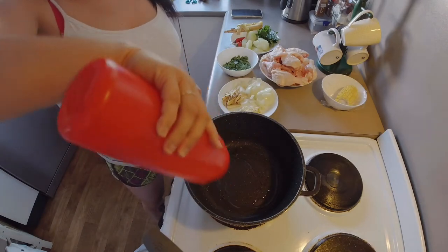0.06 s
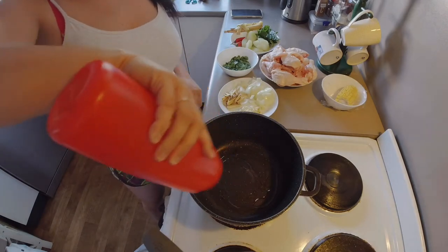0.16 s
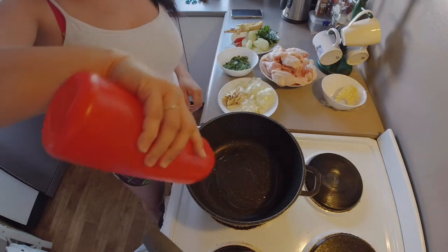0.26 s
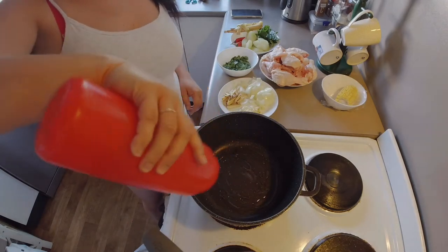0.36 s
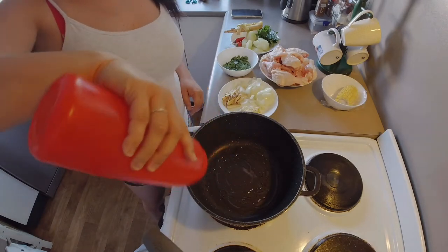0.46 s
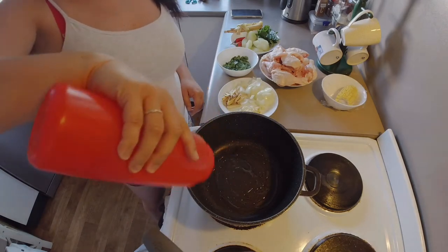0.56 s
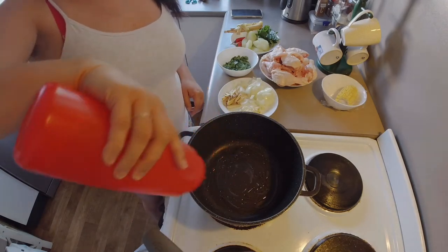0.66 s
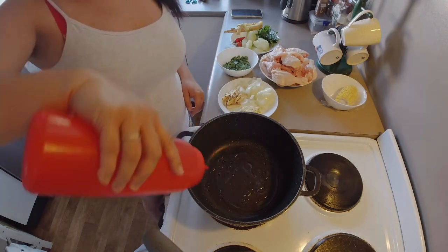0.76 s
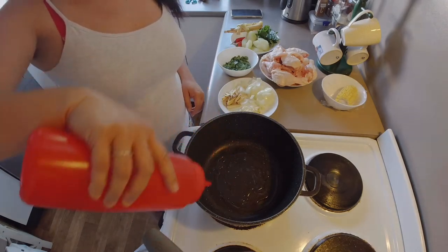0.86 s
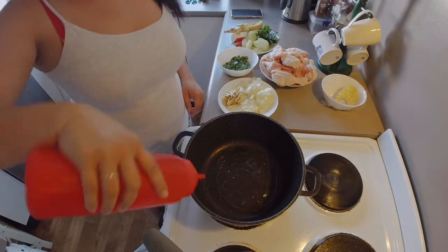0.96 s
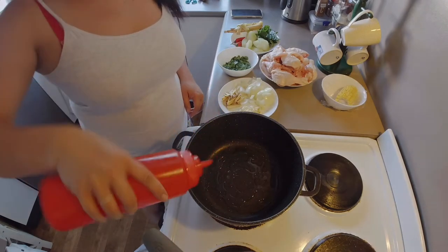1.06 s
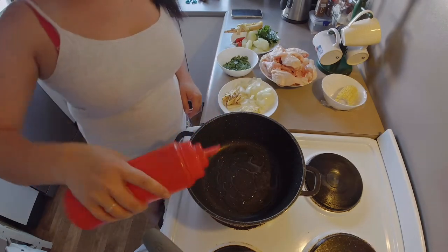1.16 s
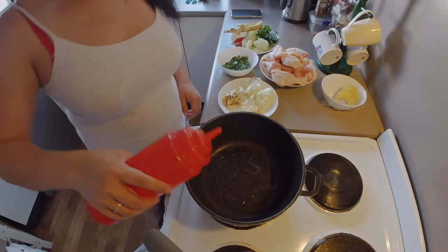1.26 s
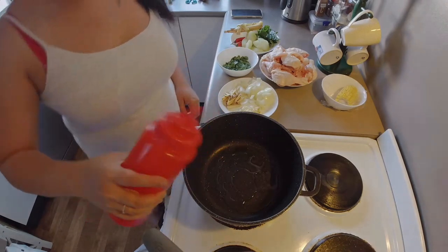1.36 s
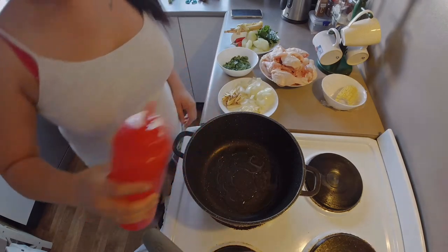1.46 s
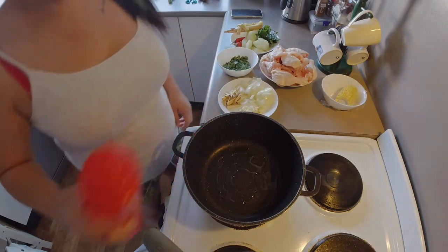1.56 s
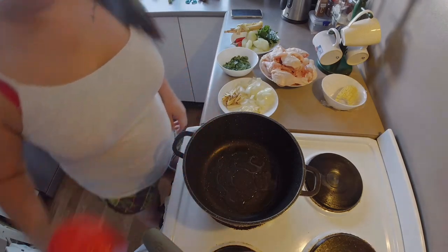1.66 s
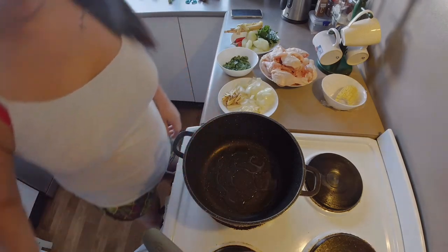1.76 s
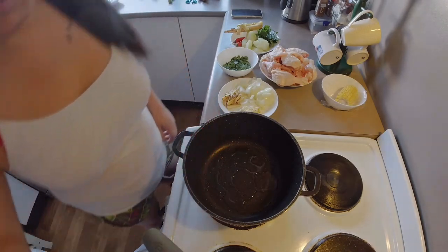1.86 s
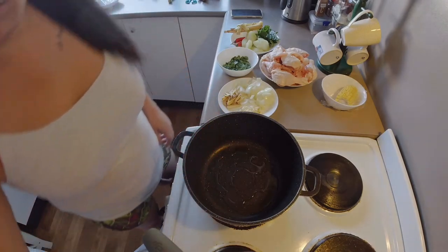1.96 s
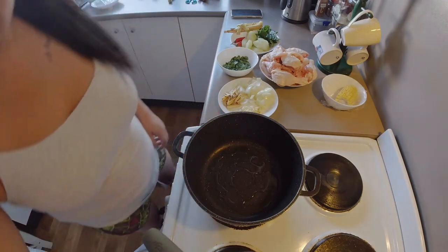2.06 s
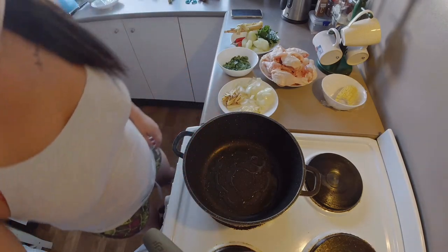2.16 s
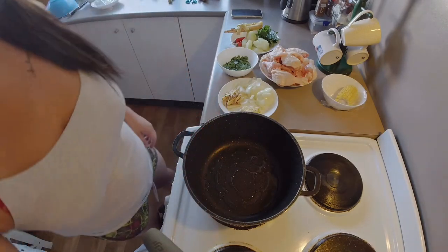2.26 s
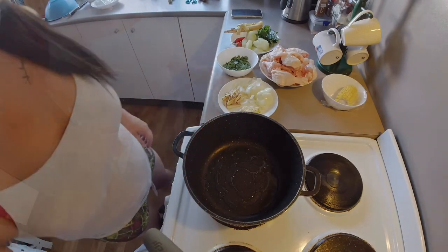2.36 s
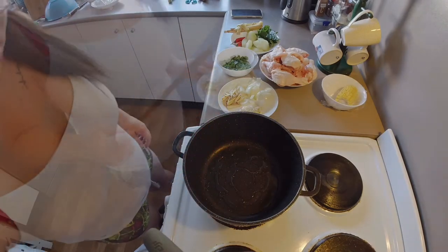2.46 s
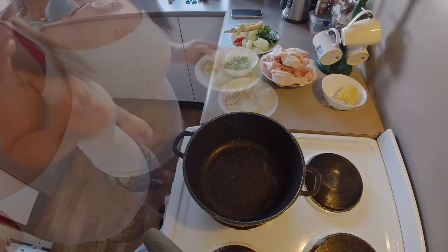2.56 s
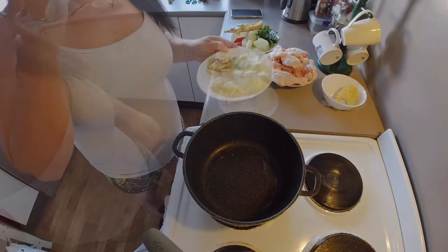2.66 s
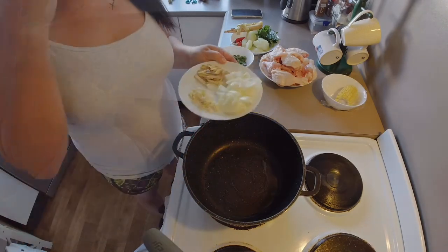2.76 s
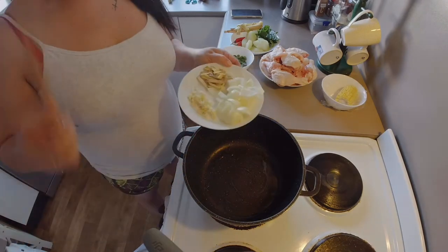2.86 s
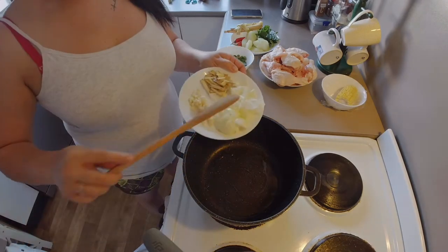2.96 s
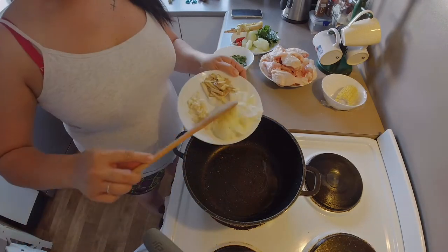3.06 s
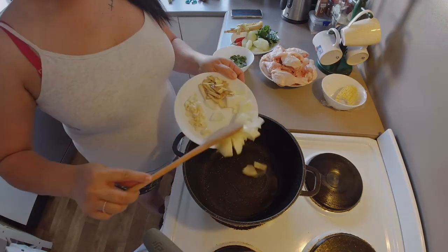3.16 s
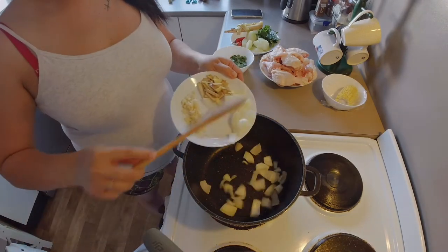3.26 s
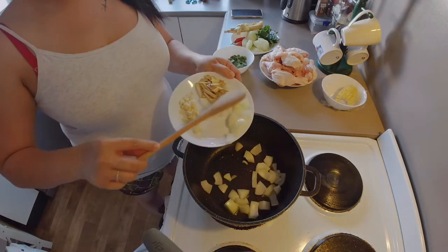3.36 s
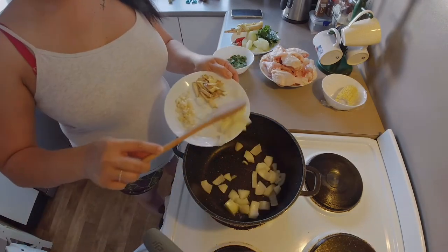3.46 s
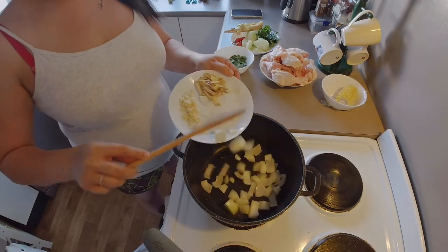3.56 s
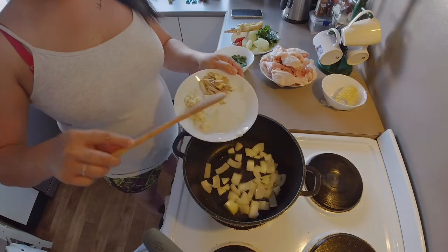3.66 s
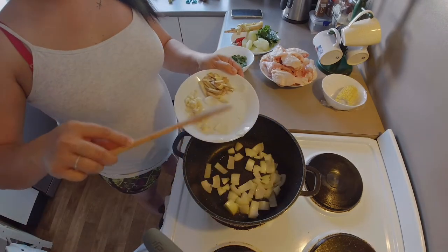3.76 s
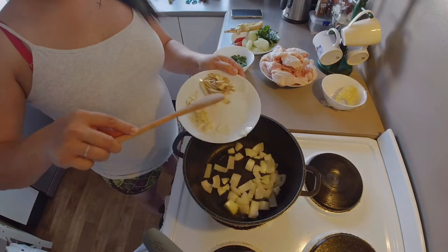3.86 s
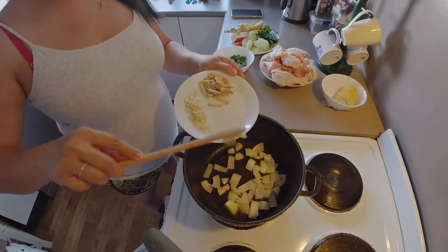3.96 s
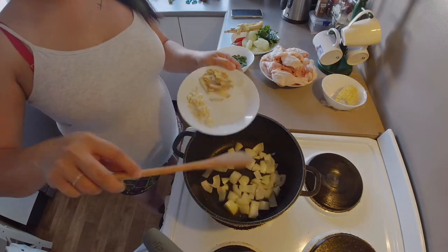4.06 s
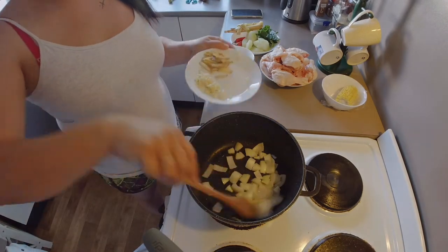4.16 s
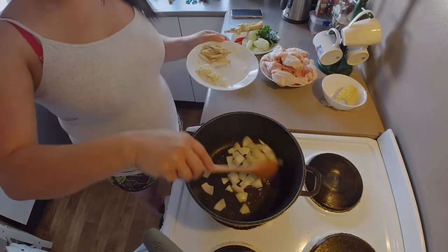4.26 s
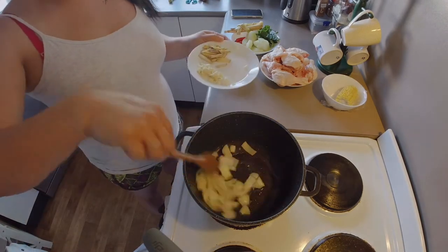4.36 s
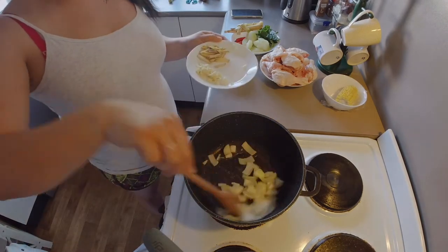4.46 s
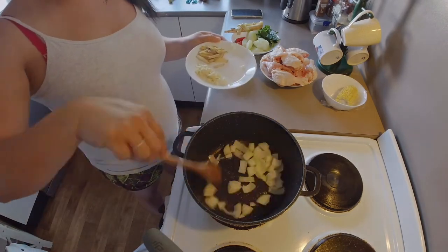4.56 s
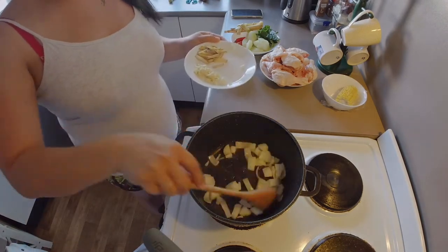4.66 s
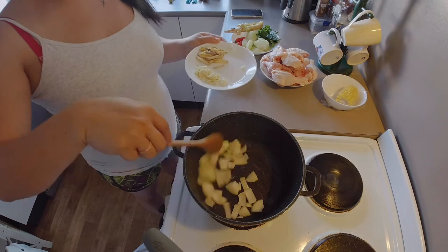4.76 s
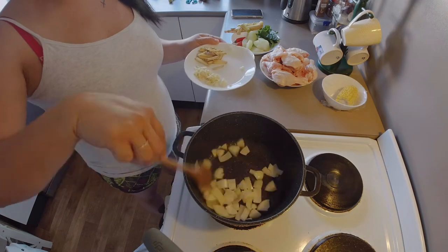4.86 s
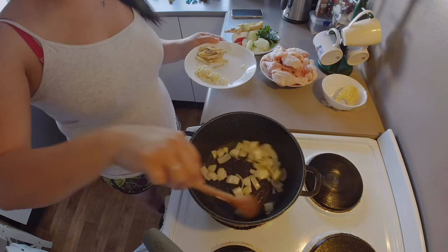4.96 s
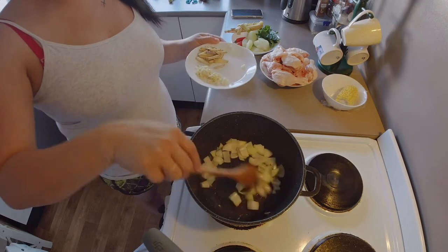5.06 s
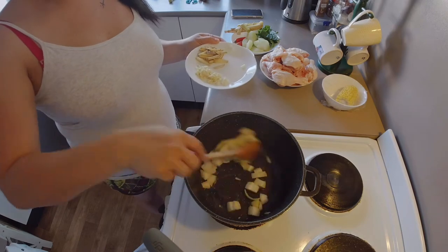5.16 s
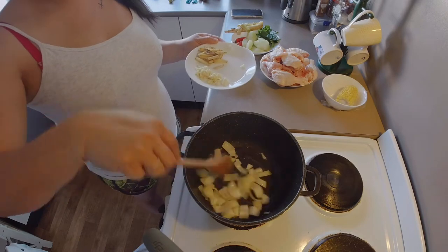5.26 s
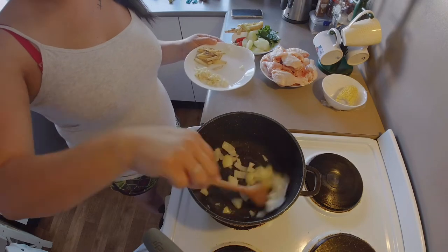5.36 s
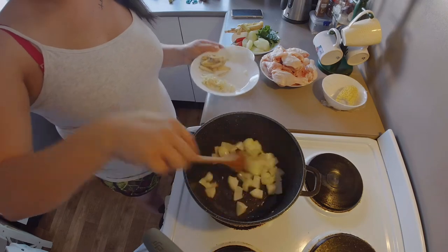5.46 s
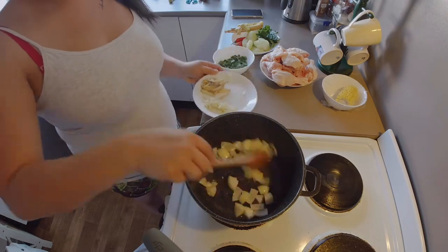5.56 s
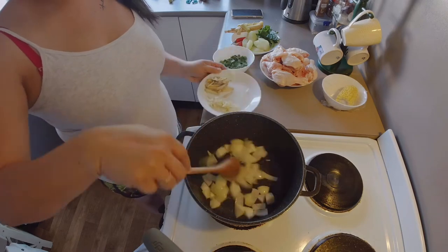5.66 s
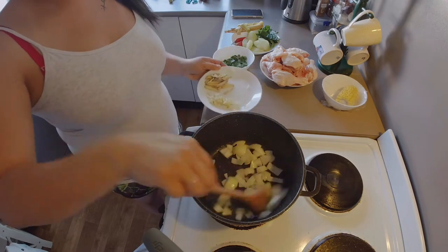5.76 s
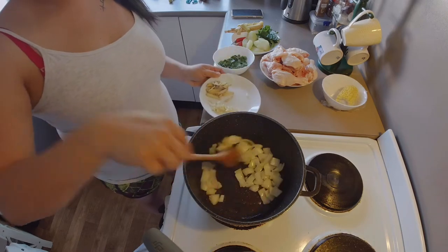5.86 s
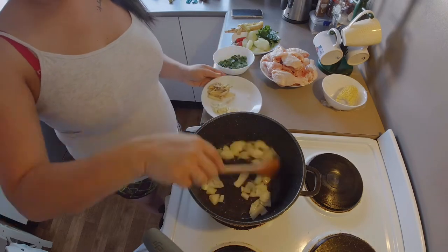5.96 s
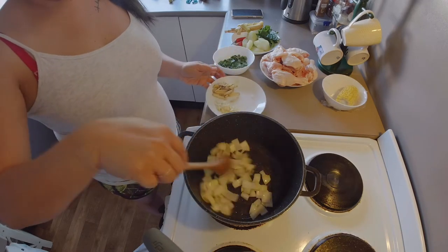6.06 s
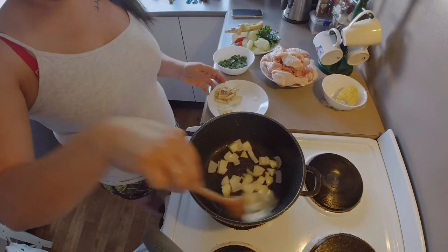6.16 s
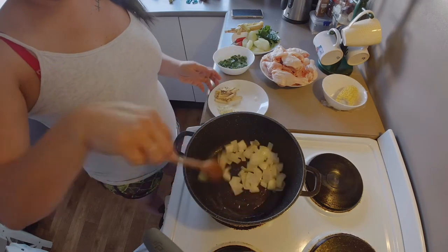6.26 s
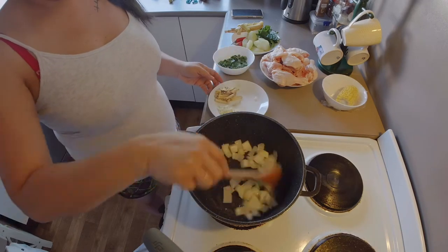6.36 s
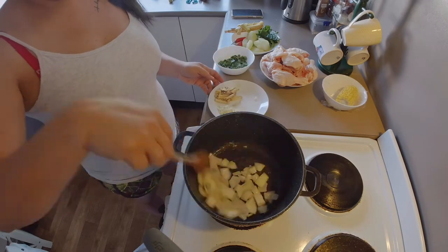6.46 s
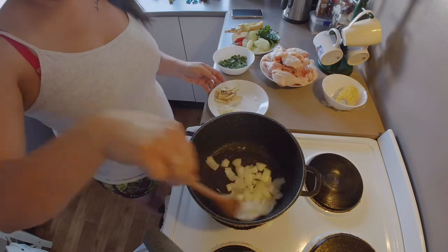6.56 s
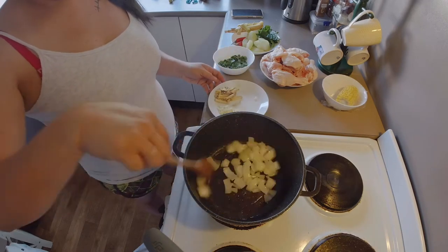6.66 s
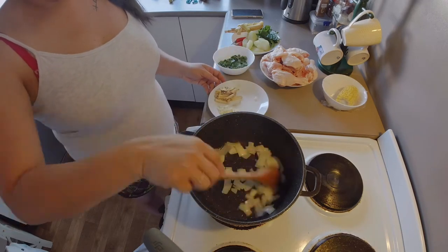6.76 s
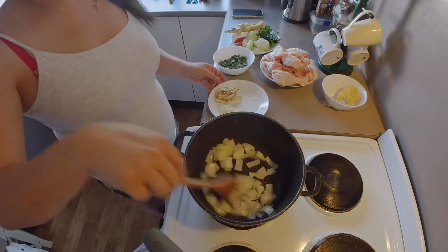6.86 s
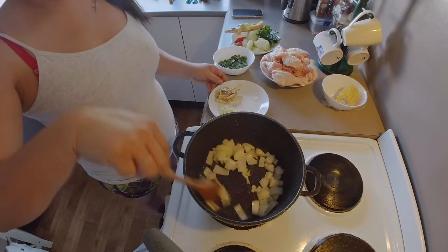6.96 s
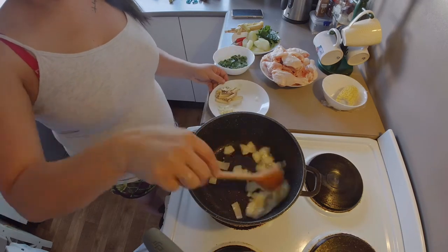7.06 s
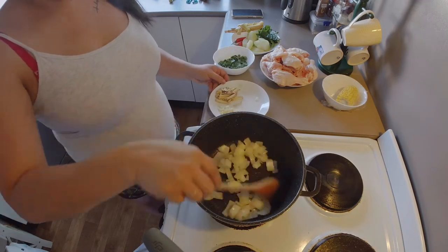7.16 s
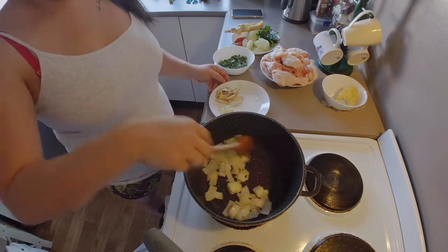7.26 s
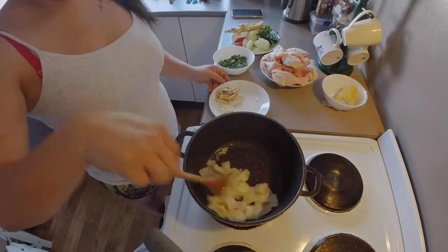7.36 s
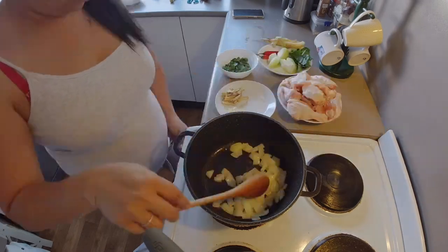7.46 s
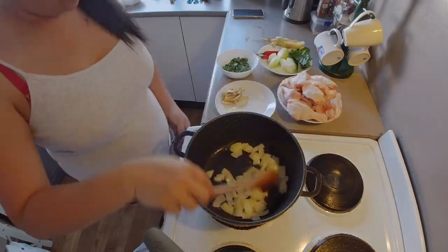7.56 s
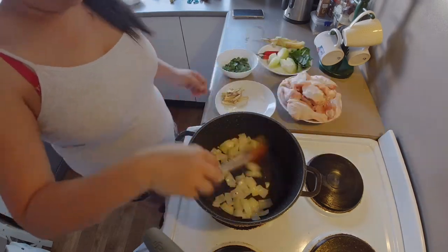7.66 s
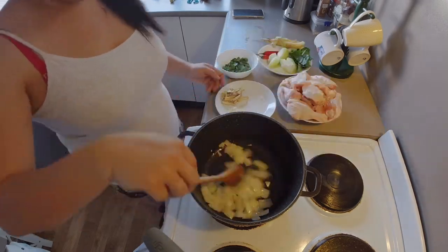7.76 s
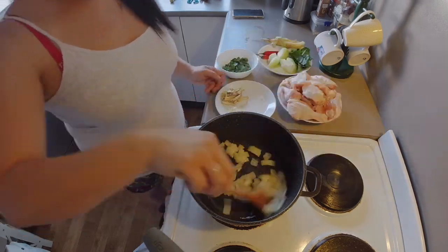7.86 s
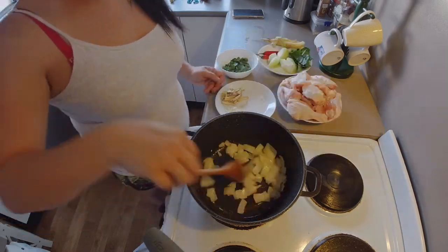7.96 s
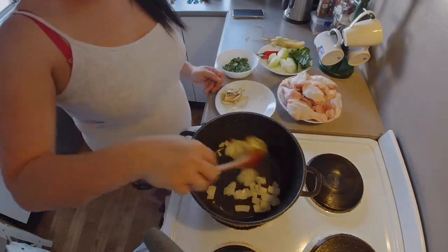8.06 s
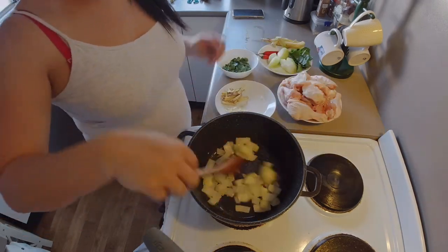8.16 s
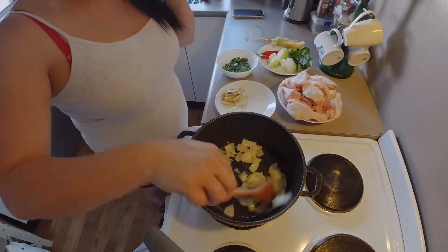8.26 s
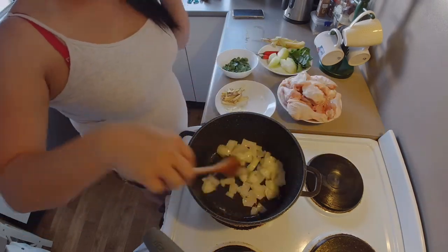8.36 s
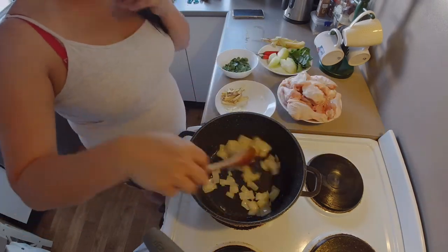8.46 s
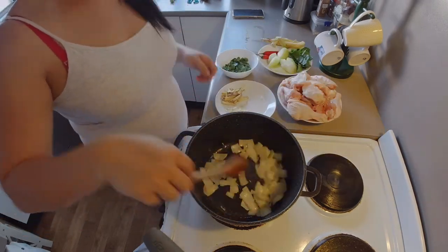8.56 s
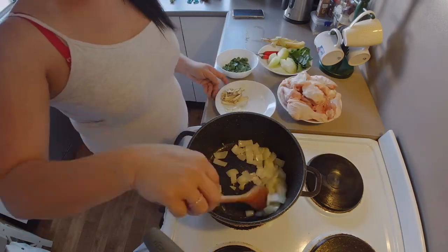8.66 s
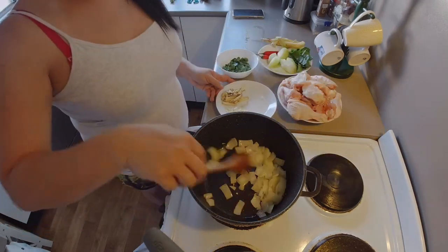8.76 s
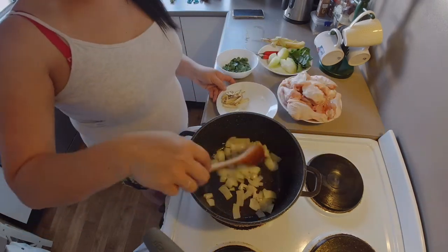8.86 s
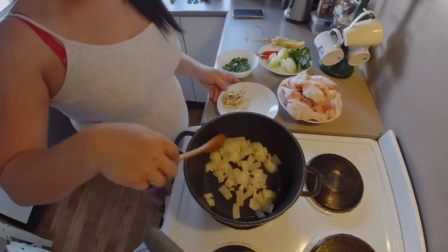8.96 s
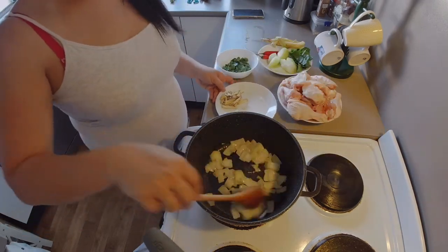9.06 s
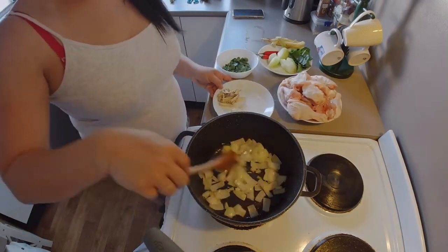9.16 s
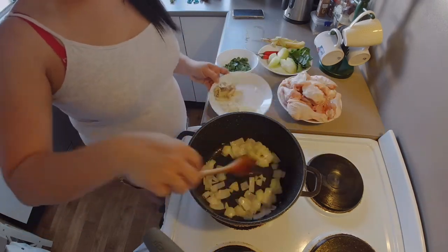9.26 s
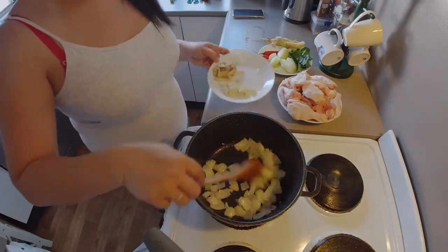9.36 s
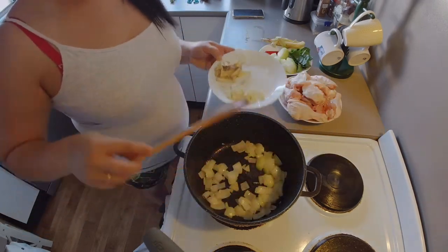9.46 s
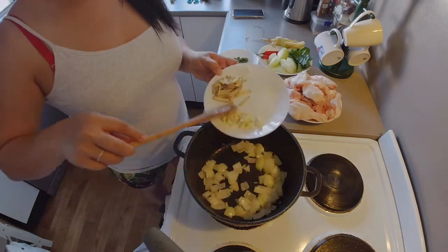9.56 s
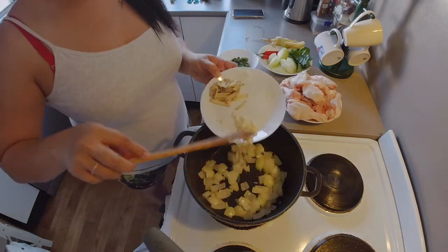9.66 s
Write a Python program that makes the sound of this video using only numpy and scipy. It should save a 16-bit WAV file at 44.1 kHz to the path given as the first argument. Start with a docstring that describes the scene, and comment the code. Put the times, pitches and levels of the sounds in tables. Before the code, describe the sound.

A plastic bottle clicks, a cupboard bangs, then onion drops into hot oil, sizzling and spitting as a wooden spoon knocks and scrapes.

```python
"""A bottle snaps and whistles, a cupboard bangs, then frying swells, crackles and slowly dies down under wooden knocks.
Oil is squeezed into a heavy pot, and the bottle is put away; diced onion slides off a plate into the hot oil.
A wooden spoon pushes it round and rings the metal wall, over the low hum of a small kitchen, from just above the stove.
Blows are short noise bursts through resonant filters with decaying modes; bubbles and friction are dense random
clicks through filters; hum is filtered noise. Phase and level differences between the two sides give width."""
import sys
import numpy as np
from scipy import signal
from scipy.fft import rfft, irfft, next_fast_len
from scipy.io import wavfile
from scipy.ndimage import uniform_filter1d

SR = 44100
rng = np.random.default_rng(int(sys.argv[2]) if len(sys.argv) > 2 else 0)


def int16_out(signal):
    """Quantize to a 16-bit WAV file."""
    q = np.round(np.clip(np.atleast_2d(signal).T, -1, 1) * 32767)
    wavfile.write(sys.argv[1], SR, q.astype(np.int16))


N = 428211
T = np.arange(N) / SR  # time in s

# Colour of the simmer, and of the pot floor under a scrape: pitch_hz, level_db
SIMMER = [(900, -19), (1500, -20), (1800, -9), (2250, -1), (2620, 5.5), (2950, -7.5), (3150, -15.5),
          (3600, 5.5), (4100, -3), (4500, 0), (5600, 3), (9000, -30.5)]
# Resonances of a hard contact on the pot: pitch_hz, level_db
CLACK = [(800, -15), (1130, -17.5), (1280, -3), (1400, -8), (1520, 6), (1700, -12), (2280, 2), (2420, 1),
         (2620, 9), (2980, -1), (3150, -11), (5000, -44)]
# Width of the sound from the pot: pitch_hz, greatest side_minus_mid_db
POT_WIDTH = [(60, -14), (125, -13), (250, -10), (500, -16), (1000, -24), (2000, -20), (4000, -13),
             (8000, -9), (15000, -5)]
# Dice landing in the pot: start_s, level_db, hardness_db (treble up, bass down)
DICE = [(3.119, -54.5, -2), (3.148, -46.5, 0.5), (3.18, -41, -0.5), (3.208, -43, 3.5), (3.217, -35, -1),
        (3.227, -35, 2), (3.254, -35, 3.5), (3.53, -40.5, 5), (3.563, -38.5, 8), (3.659, -44, 1)]
# Spoon against the wall, then dropping to the floor: start_s, level_db, hardness_db, drop_level_db,
# ring_db, ring_tilt (dB per octave), lowest_mode_db (added to the lowest mode)
WALL_KNOCKS = [(4.227, -40.5, 6, -61, -55, -22, 1), (4.357, -46.5, 0, -43.5, -47.5, 8, 7),
               (5.31, -41.5, -6.5, -50, -48, -15, -3), (6.461, -46.5, 3, -62, -43.5, 0.5, 7),
               (6.54, -41.5, 0.5, -44.5, -44, -1, -8), (6.962, -42.5, 6, -41.5, -40.5, -8, -14),
               (7.351, -41.5, 1, -61, -42, 8, 7), (7.733, -39, 0, -44, -36.5, 1, -12),
               (8.718, -39, 2, -40, -46, 1.5, -14), (9.115, -40.5, -7, -43, -48.5, -7, -16)]

LANDS_S, SWELL_S = 3.12, 0.18  # frying starts as the onion lands, and its rise time
FIZZ_DB = -45.5  # fizz level while the onion is wet
HUSH_S = 7.459  # the ring stops dead here and the frying dips briefly
STIR_FROM_S, STIR_TO_S, STROKES_PER_S = 4.15, 9.4, 2.5


def undb(db):
    """Decibels are logarithmic: convert them to amplitude gain."""
    return 10 ** (np.asarray(db) / 20)


def unit(x):
    """Root-mean-square normalisation: scale to rms 1."""
    return x / np.sqrt(np.mean(x ** 2))


def curve(rows):
    """Linear interpolation of (time, value) rows over the whole scene."""
    rows = np.array(rows)
    return np.interp(T, rows[:, 0], rows[:, 1])


def colour(x, points):
    """Minimum-phase filtering through (Hz, dB) points: resonances ring only after they are excited."""
    size = 4096
    hz, db = np.transpose(sorted(points))
    log_hz = np.log(np.fft.rfftfreq(size, 1 / SR) + 1)
    log_gain = np.log(undb(np.interp(log_hz, np.log(hz), db)))
    # folding the cepstrum on to positive times makes the filter causal
    cepstrum = irfft(log_gain)
    cepstrum[1:size // 2] *= 2
    cepstrum[size // 2 + 1:] = 0
    response = irfft(np.exp(rfft(cepstrum)))
    return signal.fftconvolve(x, response)[:len(x)]


def fade(t60, size):
    """Exponential damping: amplitude falls by 60 dB in t60 seconds."""
    return np.exp(-np.log(1000) * T[:size] / t60)


def mode(hz, t60, size):
    """Free vibration: one damped sinusoidal mode."""
    return np.sin(2 * np.pi * hz * T[:size]) * fade(t60, size)


def burst(t60, size):
    """Broadband excitation: white noise under exponential damping."""
    return rng.standard_normal(size) * fade(t60, size)


def blow(x, db):
    """Short-time energy: set the rms level of the loudest 10 ms."""
    return x * undb(db) / np.sqrt(uniform_filter1d(x ** 2, SR // 100).max())


def add(track, s, x):
    """Superposition: mix a sound in at time s."""
    start = max(int(s * SR), 0)
    track[start:start + len(x)] += x[:N - start]


def walk(rate):
    """Slow modulation: a smoothed random wander of rms 1, with rate new values per second."""
    hold = max(int(SR / rate), 1)
    steps = np.repeat(rng.standard_normal(N // hold + 1), hold)[:N]
    return unit(uniform_filter1d(steps, hold))


def crackle(rate, spread_db, tail_s, cap_db, count=6):
    """Shot noise: many small and a few large random clicks, in families of short noise tails; rms 1."""
    out, clicks = np.zeros(N), int(rate * N / SR / count)
    for _ in range(count):
        size_db = np.minimum(spread_db * rng.exponential(size=clicks), cap_db)
        size = undb(size_db) * rng.choice([-1, 1], clicks)
        train = np.bincount(rng.integers(0, N, clicks), size, N)
        out += signal.oaconvolve(train, unit(burst(tail_s, size=256)))[:N]
    return unit(out)


def ports(x, width, size=48):
    """Scattering: quadrature phase puts the two sides out of step but equally loud at each pitch."""
    length = next_fast_len(N)
    # smooth random sign: which side leads at each pitch
    lead = np.tanh(4 * unit(rfft(burst(.003, size), length).imag))
    hz, db = np.transpose(width)
    gain = undb(np.interp(np.fft.rfftfreq(length, 1 / SR), hz, db))
    side = irfft(rfft(x, length) * 1j * lead * gain, length)[:N]
    return np.array([x + side, x - side])


def rub(strokes, body):
    """Stick-slip friction: dense slips through the body, brightest round each stroke's centre."""
    out = np.zeros(N)
    slips = colour(crackle(rate=2500, spread_db=3.0, tail_s=0.0016, cap_db=5), body)
    for s, length_s, db, hz in strokes:
        start, size = int(s * SR), int(length_s * SR)
        band = [(hz / 4, -40), (hz * 0.53, -12), (hz, 0), (hz * 1.55, -13), (hz * 4, -50)]
        stroke = colour(slips[start:start + size], band)
        add(out, s, blow(stroke * np.hanning(size) ** .5, db))
    return out


def hum():
    """Steady background noise: a low rush, nearly alike on both sides, whose depth fades as frying starts."""
    # Colour of the kitchen: pitch_hz, level_db
    hum_colour = [(15, -34), (25, -1), (140, -7.5), (184, -10), (259, -27), (340, -12.5), (414, -24),
                  (492, -15), (543, -22.5), (661, -18.5), (786, -26.5), (1060, -25.5), (1250, -31),
                  (2690, -35), (9000, -57), (11700, -96), (19800, -120)]
    # Its course: time_s, level_db (before the deepest part is taken out)
    hum_level = [(0, -62.5), (2.3, -59.5), (2.7, -59.5), (3.05, -61), (3.6, -65), (9.71, -68)]
    mid, side = (unit(colour(rng.standard_normal(N), hum_colour)) for _ in range(2))
    deep = signal.sosfiltfilt(signal.butter(2, 66, fs=SR, output="sos"), mid)
    mid = mid - np.clip((T - 2.9) / 0.27, 0, 1) * deep
    side = colour(side, [(60, -26.5), (200, -12), (600, -16), (3000, -0.5)])
    return np.array([mid + side, mid - side]) * undb(curve(hum_level))


def kitchen(x, t60=0.059, room_db=-18, size=16000):
    """Reverberation: a short diffuse tail, different on each side, starts 6 ms after the sound."""
    tails = [burst(t60, size) * (T[:size] > .006) for _ in range(2)]
    wet = [signal.fftconvolve(x, tail / np.linalg.norm(tail))[:N] for tail in tails]
    return undb(room_db) * np.array(wet)


def bottle(size=12000):
    """Snap-through buckling: the plastic wall clicks back, hums briefly and bumps the air inside."""
    # Squeeze bottle snapping back into shape: start_s, level_db, wall_pitch_hz, air_bump_db
    snaps = [(.040, -67, 4400, -82), (.14, -73, 2580, -83), (0.338, -53.5, 1700, -69),
             (.360, -54.5, 657, -82), (0.759, -60, 4660, -68), (1.204, -36.5, 1883, -64),
             (1.289, -34, 1796, -43.5)]
    air = [(50, -22), (140, 11.5), (220, -14), (330, -2.5), (600, -16), (2000, -55), (6000, -81)]
    out = np.zeros(N)
    for s, db, hz, bump_db in snaps:
        wall = [(hz * 0.23, -35), (hz * 0.41, -26), (hz * 0.47, -9), (hz * 0.78, -17),
                (hz * 0.816, -10), (hz, 2), (hz * 1.2, -11), (hz * 1.16, -16),
                (hz * 1.36, -30), (hz * 4, -65), (hz * 6, -90)]
        snap = burst(0.05, size) + undb(-17.0) * burst(0.29, size)
        add(out, s, blow(colour(snap, wall), db))
        add(out, s, undb(db - 17) * mode(hz, .22, size))
        add(out, s, blow(colour(burst(0.27, size), air), bump_db))
    # air whistles back in through the nozzle, falling in pitch
    pitch = np.interp(T, [1.315, 1.345, 1.42], [4700, 3950, 3750]) * (1 + 0.049 * walk(900))
    swell = np.interp(T, [1.31, 1.33, 1.43], [0, 1, 0])
    whistle = np.sin(2 * np.pi * np.cumsum(pitch) / SR) * swell
    return out + undb(-67.5) * whistle


def cupboard(size=26000):
    """Forced and free vibration: shoves shake carcass, panel and contents; the door modes ring on."""
    # Things put away, shutting and settling: start_s, swell_s, t60_s (scaled for each part below),
    # boom_db (offset below), wood_db, rattle_db
    shoves = [(2.203, 0.0031, 0.12, -69, -41.5, -45), (2.385, 0.0099, 0.15, -60.5, -39, -82),
              (2.400, 0.0063, 0.19, -29.5, -42, -58), (2.413, 0.0017, 0.28, -35, -42, -38.5),
              (2.438, 0.0017, 0.26, -35.5, -35, -41.5), (2.682, 0.01, 0.15, -28.5, -51.5, -85),
              (2.755, 0.013, 0.38, -40, -62.5, -86), (2.836, 0.02, 0.43, -62, -56, -74.5)]
    # Carcass: pitch_hz, level_db
    boom = [(35, -24), (50, -10.5), (87, 0.5), (125, 1.5), (180, -8.5), (240, -15.5), (600, -62.5),
            (3000, -97)]
    # Door panel: pitch_hz, level_db
    wood = [(100, -30), (250, -3.5), (420, 2), (720, -5), (1150, -8.5), (1700, -12), (2600, -23),
            (5000, -27), (10000, -73)]
    # Things inside: pitch_hz, level_db
    rattle = [(500, -9), (1800, -5.5), (3500, -7.5), (6000, -5.5), (9000, -8.5), (13000, -9.5),
              (16000, -21)]
    # Ringing door: pitch_hz, level_db, t60_s
    door_modes = [(176, -5.5, 0.72), (421, -5, 0.61), (582, -6.5, 0.69), (665, -2.5, 0.43),
                  (734, -0.5, 0.43), (880, -8.5, 0.36), (1115, -0.5, 0.079), (1590, -7, 0.26),
                  (7750, -6.5, 0.24), (8680, 1, .13), (13400, 0, 0.14)]
    door_s, door_db = 2.414, -36.5
    out = np.zeros(N)
    for s, swell_s, t60, boom_db, wood_db, rattle_db in shoves:
        swell = 1 - np.exp(-(T[:size] / swell_s) ** 2)
        parts = ((boom, boom_db - 4.5, 1.1), (wood, wood_db, .95), (rattle, rattle_db, .55))
        for spectrum, db, t60_share in parts:
            add(out, s, blow(colour(swell * burst(t60 * t60_share, size), spectrum), db))
        carcass = .7 * mode(87, t60, size) + mode(122, t60, size)
        add(out, s, blow(swell * carcass, boom_db - 3))
    ring = sum(undb(door_db + db) * mode(hz, t60, size) for hz, db, t60 in door_modes)
    chatter = 1 + .5 * walk(70)[:size]  # the loose panel rings unevenly
    add(out, door_s, ring * chatter)
    return out


def rustling():
    """Sliding friction: soft rubbing as things are handled, with no body resonance."""
    # Rubs: start_s, length_s, level_db, centre_hz
    rustles = [(1.178, 0.023, -55.5, 2160), (1.92, 0.19, -73, 2300), (2.08, 0.15, -59, 637),
               (2.14, 0.13, -55.5, 2410), (2.16, 0.09, -62.5, 7700), (2.29, 0.19, -62, 4300),
               (2.384, 0.038, -38, 1120), (2.685, 0.046, -58, 1240), (2.87, 0.056, -58, 1410)]
    return rub(rustles, [(100, 0), (16000, 0)])


def plate(size=4000):
    """Heavy damping: china held in the hand gives only a click and two very short pings."""
    # Spoon clicks while sweeping onion off: start_s, click_db (gain before colouring), low_ping_db, high_ping_db
    taps = [(3.597, -24, -40, -33), (3.6024, -26, -35, -16), (3.7417, -35, -26.5, -45),
            (4.0384, -21, -28, -21)]
    # China: mean pitch_hz, t60_s
    china_modes = [(6400, 0.038), (11100, 0.016)]
    china = [(800, -45), (2000, -11), (2700, 1.5), (3200, -3), (6500, 0.5), (9000, 3.5),
             (13000, 6), (16000, -13)]
    out = np.zeros(N)
    for s, click_db, *ping_levels in taps:
        click = colour(burst(0.011, size) + undb(-17) * burst(0.054, size), china)
        pings = sum(undb(db) * mode(hz * (1 + 0.0098 * rng.standard_normal()), t60, size)
                    for db, (hz, t60) in zip(ping_levels, china_modes))
        add(out, s, undb(click_db) * click + pings)
    return out


def knocks(blows, clack_db=0, size=6000):
    """Impact excitation: contact and judder drive the damped floor and the air; every spot is coloured anew."""
    # Low thud of the floor: pitch_hz, level_db
    thud = [(60, -31.5), (200, -13), (330, -2.5), (420, 2), (620, -0.5), (870, 0.5), (1100, -11),
            (1600, -15.5), (5000, -66)]
    # High tick of the contact: pitch_hz, level_db
    tick = [(2500, -35), (3300, -15), (3750, -9), (4130, 6.5), (4400, -5), (5500, -15), (8000, -17),
            (10300, -15.5), (16000, -23.5)]
    # Air in the pot: pitch_hz, level_db
    cavity = [(40, -33), (80, -14), (130, -13.5), (180, -15), (215, -19), (255, -2), (305, 4), (345, -3.5),
              (400, -13), (800, -39), (4000, -84)]
    # Thud, clack, tick and air in turn: level_db, hardness_slope (dB per dB), tail_db
    knock_parts = [(-5.5, -0.77, -34.5), (0, 0.23, -32), (-1.5, 1., -28.5), (-10.5, -1., -26)]
    click_db, spot_spread_db, delay_s = -25, 2.5, .0015
    spectra, extra_db = (thud, CLACK, tick, cavity), (0, clack_db, 0, 0)
    out = np.zeros(N)
    for s, db, hard_db in blows:
        for spectrum, part_extra_db, (part_db, slope, tail_db) in zip(spectra, extra_db, knock_parts):
            contact = undb(-17) * burst(0.041, size) + undb(tail_db) * burst(0.2, size)
            contact[0] += 1
            spot = [(hz, gain_db + spot_spread_db * rng.standard_normal()) for hz, gain_db in spectrum]
            level_db = db + part_db + slope * hard_db + part_extra_db
            add(out, s + delay_s, blow(colour(contact, spot), level_db))
        add(out, s + delay_s, undb(db + hard_db + click_db) * burst(0.0029, size))
    return out


def dice():
    """Soft impact: onion dice land in the pot with less clack than wood."""
    return knocks(DICE, clack_db=-8)


def each_stroke():
    """Jittered periodicity: one random moment in every stroke, with two deviations within -1 to 1."""
    starts = np.arange(STIR_FROM_S, STIR_TO_S - 1 / STROKES_PER_S, 1 / STROKES_PER_S)
    when, a, b = rng.random((len(starts), 3)).T
    return zip(starts + when / STROKES_PER_S, 2 * a - 1, 2 * b - 1)


def spoon_blows():
    """Impact timing: every firm blow, wall knocks followed by a drop, as (s, level dB, hardness dB)."""
    # Spoon on the floor of the pot: start_s, level_db, hardness_db
    floor_knocks = [(4.132, -43.5, -6.5), (4.179, -48.5, 1), (4.432, -42, 0.5), (4.791, -37.5, 3),
                    (4.972, -47, 5), (5.122, -46, 0.5), (5.254, -55, -13), (5.405, -45.5, 0.5),
                    (5.561, -49, 2.5), (5.721, -39, 2.5), (5.894, -40.5, 5.5), (6.064, -36.5, 0),
                    (6.127, -35.5, 5.5), (6.143, -43, 12), (6.23, -48.5, 3.5), (6.36, -48, -0.5),
                    (6.861, -37.5, 1), (7.168, -40, 2.5), (7.253, -48, 4.5), (7.273, -44, 8),
                    (7.549, -44, 1.5), (7.632, -40.5, -2.5), (7.808, -32.5, 0), (7.847, -40.5, 2),
                    (8.035, -47.5, -5), (8.145, -39.5, -10), (8.532, -46.5, -4.5), (8.82, -47.5, -4.5),
                    (8.994, -38.5, -0.5), (9.164, -37.5, -0.5), (9.36, -50, 5), (9.539, -53.5, 7)]
    drop_s = .021  # from wall to floor
    wall = [(s, db, hard_db) for s, db, hard_db, *_ in WALL_KNOCKS]
    drops = [(s + drop_s, drop_db, 0) for s, _, _, drop_db, *_ in WALL_KNOCKS]
    return list(floor_knocks) + wall + drops


def agitation():
    """Energy addition: dice move unevenly under the stirring and roll on after each blow."""
    stir_db, after_blow_db = -67, -23  # the second against the level of a blow
    settle_s, uneven_db = 0.058, 3  # time constant of the power; rms wander
    stirring = uniform_filter1d(1. * ((T > STIR_FROM_S) & (T < STIR_TO_S)), SR // 10)
    power = stirring * undb(stir_db) ** 2
    settling = np.exp(-T[:SR] / settle_s)
    for s, db, _ in spoon_blows() + list(DICE):
        add(power, s, undb(db + after_blow_db) ** 2 * settling)
    return np.sqrt(np.abs(power)) * undb(uneven_db * walk(20))


def tumbling():
    """Random micro-impacts: soft dice tumble in dull slips and tap the pot in a faint patter."""
    # Dull tumbling: pitch_hz, level_db
    tumble = [(60, -19.5), (130, -0.5), (215, -1), (290, 5), (400, -3.5), (600, -7.5), (850, -12),
              (1100, -34), (1500, -13), (2000, -40)]
    slips = unit(colour(crackle(rate=500, spread_db=3., tail_s=.003, cap_db=11), tumble))
    taps = unit(colour(crackle(rate=400, spread_db=3., tail_s=.005, cap_db=10), CLACK))
    return (slips + undb(-3.5) * taps) * agitation()


def scraping():
    """Stick-slip friction: the spoon drags over the floor, lightly in every stroke, at times firmly."""
    # Firm scrapes over the oily floor: start_s, length_s, level_db, centre_hz
    firm = [(4.37, 0.057, -53, 4100), (5.47, 0.015, -48, 4170), (6.66, 0.051, -58, 3970),
            (7.65, 0.026, -51.5, 2700), (7.965, 0.024, -50.5, 4100), (8.04, 0.046, -52, 2380),
            (8.22, 0.049, -51, 2660), (8.365, 0.029, -49, 3960), (9.32, 0.05, -55, 3430)]
    length_s, level_db, centre_hz = 0.035, -57.5, 2840  # mean light scrape
    light = [(s, length_s, level_db + 3 * force, centre_hz * (1 + 0.084 * spot))
             for s, force, spot in each_stroke()]
    return rub(list(firm) + light, SIMMER)


def spoon():
    """Impact excitation: firm blows of the wooden spoon, and a light touch in every stroke."""
    touches = [(s, -51 + 2 * force, 4 * spot - 1) for s, force, spot in each_stroke()]
    return knocks(spoon_blows() + touches)


def rings(size=30000):
    """Beating of near-equal modes: the metal wall sings in wavering pairs, with brief overtones."""
    # Wall: pitch_hz, level_db, t60_s
    wall_modes = [(3974, -5.5, 0.75), (4706, 1.5, 0.38), (6180, -2, 0.65), (8990, -3, 0.37)]
    # Overtones: pitch_hz, level_db (against the strongest mode, before a common 4.5 dB lift), t60_s
    overtones = [(2258, -12, .2), (4790, -8, .08), (7600, -15, .1), (10920, -13, .1), (12020, -11, .1)]
    pivot_hz = 5500  # where the tilt is zero
    out = np.zeros(N)
    for s, *_, ring_db, tilt_db, lowest_db in WALL_KNOCKS:
        levels = [ring_db + db + tilt_db * np.log2(hz / pivot_hz) for hz, db, _ in wall_modes]
        levels[0] += lowest_db
        ring = np.zeros(size)
        for db, (hz, _, t60) in zip(levels, wall_modes):
            partner = mode(hz + rng.normal(0, 25), t60 * .5, size)
            ring += undb(db) * (mode(hz, t60, size) + .4 * partner)
        for hz, db, t60 in overtones:
            ring += undb(max(levels) + db + 4.5) * mode(hz, t60, size)
        if s < HUSH_S:
            ring = ring * (s + T[:size] < HUSH_S)
        add(out, s + 0.0017, ring)
    return out * undb(1.6 * walk(110))  # sliding onion makes the ring waver


def frying_db():
    """Boiling rate: level against the wet onion, with surges, one brief dip and a fall as it dries."""
    # Wet faces turned on to the hot floor: centre_s, length_s (Gaussian half-width), extra_db
    wet_faces = [(3.36, 0.069, 3), (4.447, 0.13, 2), (6.645, 0.077, 4), (8.677, 0.15, 3)]
    dries_from_s, drying_db_per_s, dip_db, dip_s = 5.04, 3.0, -9.5, 0.21
    surges = sum(db * np.exp(-((T - s) / length_s) ** 2) for s, length_s, db in wet_faces)
    dip = dip_db * (T > HUSH_S) * np.exp(-np.abs(T - HUSH_S) / dip_s)
    return surges + dip - drying_db_per_s * np.maximum(T - dries_from_s, 0)


def lesser_spits(count=26):
    """Random nucleation: more drops, thinning out and following the frying level, as (s, peak dB, Hz)."""
    over_fizz_db, spread_db, low_hz, high_hz = 20.5, 8, 8710, 13500
    when, strength, pitch = rng.random((count, 3)).T
    first_s = LANDS_S + SWELL_S
    s = first_s + (T[-1] - first_s) * ((np.arange(count) + when) / count) ** 1.7
    db = FIZZ_DB + np.interp(s, T, frying_db()) + over_fizz_db + spread_db * (strength - .5)
    return list(zip(s, db, low_hz + (high_hz - low_hz) * pitch))


def spits(size=2500):
    """Explosive boiling: a water drop bursts with a sharp crack and a ping of its cavity."""
    # Chief drops bursting in the oil: start_s, peak_db (before a common 0.5 dB lift), pitch_hz
    drops = [(3.458, -17.5, 9060), (3.4825, -20, 13600), (3.5493, -19.5, 11700), (3.5764, -25, 11300),
             (4.122, -18, 11400), (4.3243, -19, 9800), (4.3594, -17, 9000), (5.8965, -23.5, 5930),
             (6.1381, -18.5, 6600), (6.4624, -18, 7800), (7.6336, -20, 10250), (7.7335, -18.5, 7670),
             (8.2489, -21, 9600), (8.3254, -29, 10100), (9.3227, -25.5, 10900), (9.535, -28, 10400),
             (9.587, -27.5, 9950)]
    out = np.zeros(N)
    for s, db, hz in list(drops) + lesser_spits():
        crack = burst(.0045, size) + undb(-18) * burst(.03, size)  # the pot throws it back
        spectrum = [(800, -45), (1700, -26), (hz * 0.33, -13), (hz * 0.86, -5), (hz, 2),
                    (hz * 1.44, -5), (20000, -12)]
        pop = colour(crack, spectrum)
        pop = pop / np.abs(pop).max() + 0.16 * mode(hz, 0.051, size)
        add(out, s, undb(db + 0.5) * pop / np.abs(pop).max())
    return out


def pops(count=250, size=500):
    """Bubble resonance: single bubbles, denser early on, each with its own pitch and time lag between sides."""
    over_fizz_db, spread_db, cap_db = 7.5, 3, 13
    out = np.zeros((2, N))
    fizz_db = FIZZ_DB + frying_db()
    for when, pitch, strength, place in rng.random((count, 4)):
        s = 3.27 + 6.4 * when ** 1.7
        extra_db = min(-spread_db * np.log(1 - strength), cap_db)
        db = fizz_db[int(s * SR)] + over_fizz_db + extra_db
        hz = 4000 + 10500 * pitch ** .6
        pop = undb(db) * (.7 * mode(hz, .005, size) + .4 * burst(.003, size))
        lag_s = (place - .5) / SR
        add(out[0], s + lag_s, pop)
        add(out[1], s - lag_s, pop)
    return signal.sosfilt(signal.butter(3, 3500, "high", fs=SR, output="sos"), out)


def frying():
    """Boiling noise: steam bubbles burst in a wide fine fizz and a lower simmer through the pot."""
    # Fine fizz: pitch_hz, level_db
    fizz_colour = [(1760, -46), (3000, -6.5), (3220, -25), (3830, -11.5), (4080, -2.5), (4410, -5),
                   (5520, -16), (6900, -3.5), (7830, -11), (9600, -0.5), (12200, -3), (13400, -1.5),
                   (15200, -4.5), (16000, -22.5)]
    # Its width: pitch_hz, side_minus_mid_db
    fizz_width = [(3000, -15), (6000, -12), (9000, -9), (12000, -4.5), (15000, -1.5)]
    simmer_db, simmer_follows = -56, 1.18  # level while wet; dB of simmer per dB of fizz
    landed, strength_db = np.clip((T - LANDS_S) / SWELL_S, 0, 1), frying_db()
    mid, side = (unit(colour(crackle(rate=8000, spread_db=4., tail_s=.006, cap_db=19), fizz_colour))
                 for _ in range(2))
    side = colour(side, fizz_width)
    fizz = np.array([mid + side, mid - side]) * undb(FIZZ_DB + strength_db + 0.19 * walk(30))
    simmer = unit(colour(crackle(rate=2600, spread_db=3.8, tail_s=.004, cap_db=18), SIMMER))
    simmer *= undb(simmer_db + simmer_follows * strength_db + 0.63 * walk(25))
    return landed * (fizz + ports(simmer, POT_WIDTH)) + pops()


def scene():
    """Superposition: everything at the stove, direct and through the room."""
    # Width of sounds from beside the stove: pitch_hz, greatest side_minus_mid_db
    handling_width = [(125, -35), (250, -22), (500, -17), (1000, -11), (2000, -6), (4000, -4), (8000, -10),
                      (14000, -2)]
    handling = bottle() + cupboard() + rustling()
    pot = plate() + dice() + tumbling() + scraping() + spoon() + rings() + spits()
    direct = ports(handling, handling_width) + ports(pot, POT_WIDTH)
    return hum() + kitchen(handling + pot) + direct + frying()


def record(dry):
    """Band limiting: the recorder cuts the top steeply above 15.8 kHz."""
    return signal.sosfilt(signal.ellip(12, .1, 80, 15800, fs=SR, output="sos"), dry)


dry = scene()
out = record(dry)
int16_out(out)
```